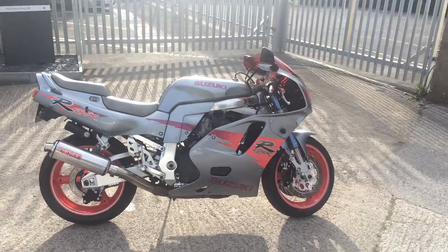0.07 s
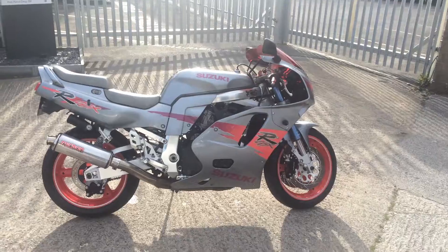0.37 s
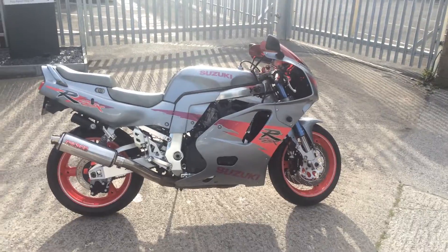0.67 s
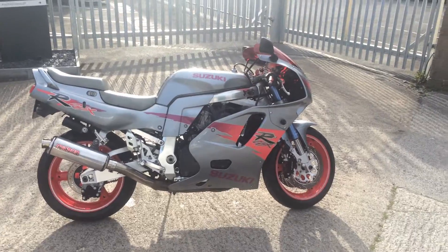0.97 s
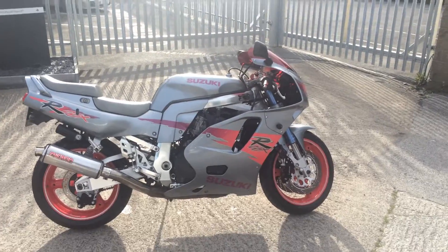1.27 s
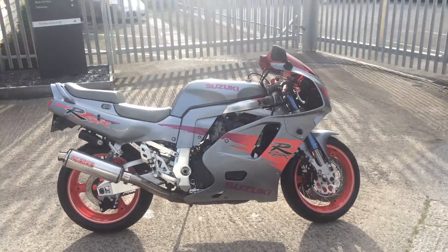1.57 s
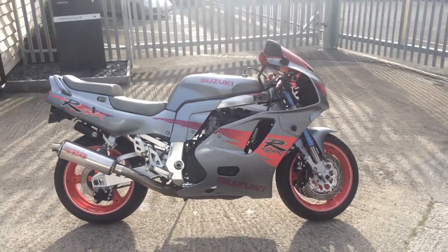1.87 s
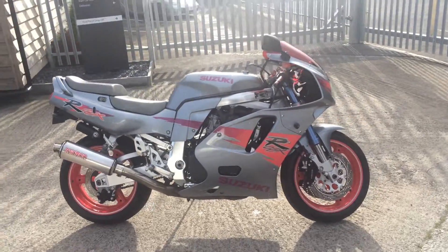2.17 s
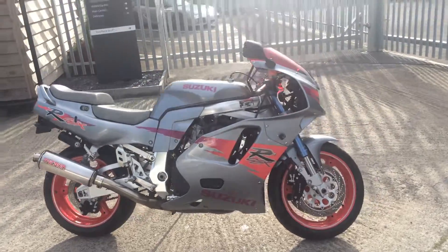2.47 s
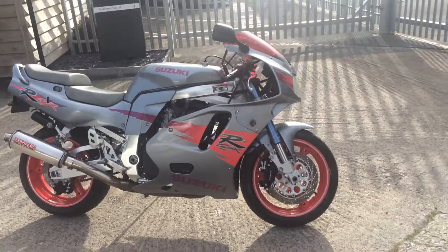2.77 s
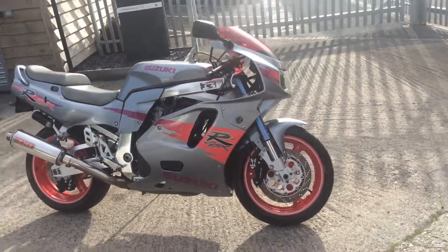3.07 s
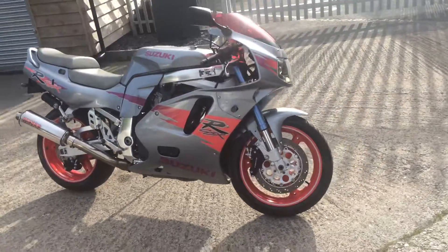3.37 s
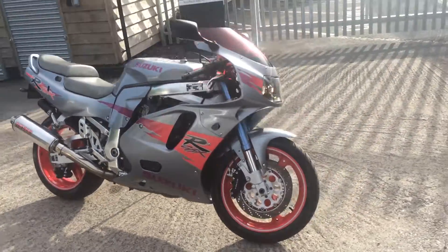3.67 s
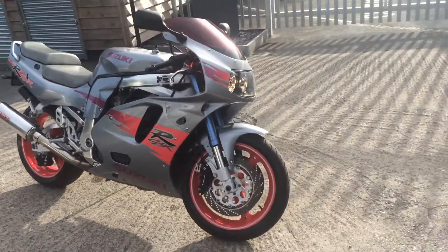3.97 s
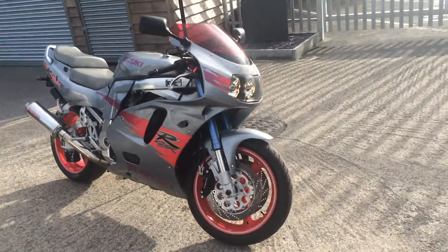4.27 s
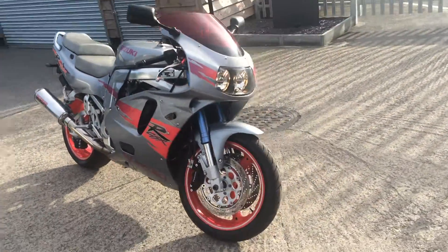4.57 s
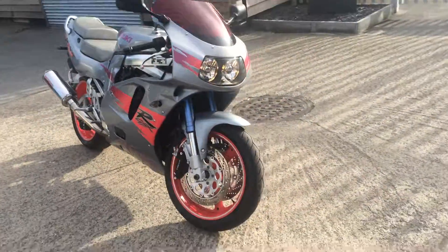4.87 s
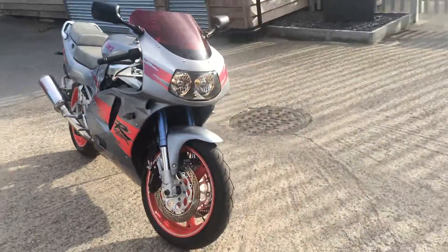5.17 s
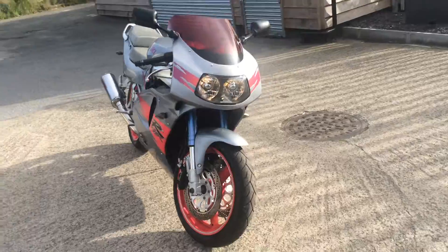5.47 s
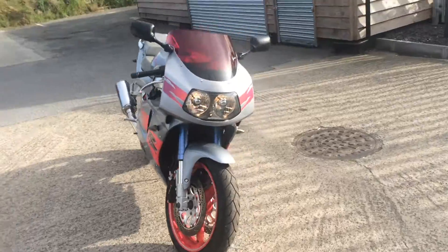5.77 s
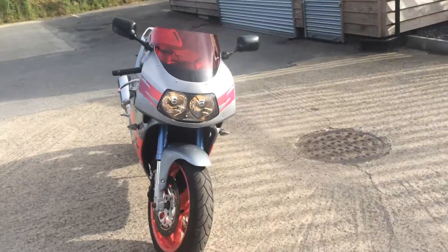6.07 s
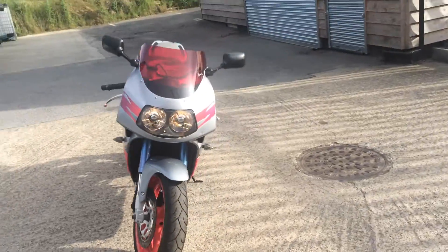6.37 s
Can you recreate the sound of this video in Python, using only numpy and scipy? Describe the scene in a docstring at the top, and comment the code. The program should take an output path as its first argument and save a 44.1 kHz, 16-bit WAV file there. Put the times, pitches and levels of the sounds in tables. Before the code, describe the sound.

A motorcycle engine runs at a lumpy idle outdoors, strong and weak firings booming through the silencer. Metallic rattling, light knocks, ticking and hiss ride on the low throb. Heard from close by on a walk from the side of the bike to its nose, the clatter changes colour and eases a little, while the exhaust begins to bounce faintly off nearby sheds.

```python
"""A thumping four-cylinder motorcycle idles unevenly, surging three times a second in a concrete yard.
Strong and weak firings boom through the silencer, and the same firings rattle the gears.
The clutch knocks, valves tick, and the chain and intake hiss in step, over a soft rumble of air.
The tone shifts as the listener walks from the bike's side to its nose; late on, an echo grows."""
import sys
import numpy as np
from scipy import signal
from scipy.fft import rfft, irfft
from scipy.io import wavfile

SR = 44100
rng = np.random.default_rng(int(sys.argv[2]) if len(sys.argv) > 2 else 0)


def wav_record(signal):
    """Record a signal, one row per channel, as 16-bit PCM in the file named by sys.argv[1]."""
    frames = np.transpose(np.atleast_2d(signal))
    bounded = np.clip(frames, -1, 1)
    # unit amplitude maps onto the largest positive 16-bit level
    quanta = np.round(bounded * 32767).astype(np.int16)
    wavfile.write(sys.argv[1], SR, quanta)


N = 292383
TIME = np.arange(N) / SR

# the bike's side, front quarter and nose as places on the walk: ahead (0 beside it, 1 in front)
VIEWPOINTS = [.1, .57, .93]


def from_db(db):
    """Turn decibels into a gain."""
    return 10 ** (np.asarray(db) / 20)


def unit_power(x):
    """Scale a signal to an average power of one."""
    return x / np.sqrt(np.mean(x ** 2) + 1e-20)


def in_time(rows):
    """Turn rows of (time_s, values...) into one curve per value."""
    times, *columns = np.transpose(rows)
    return [np.interp(TIME, times, column) for column in columns]


def clicks(times, sizes):
    """One click of the given size at each time."""
    inside = (times >= 0) & (times < TIME[-1])
    return np.bincount((times[inside] * SR).astype(int), sizes[inside], N) + 1e-18


def resonate(x, hz, width_hz):
    """Ring at one pitch; the narrower the width, the longer the ring."""
    r = np.exp(-np.pi * width_hz / SR)
    feedback = [1, -2 * r * np.cos(2 * np.pi * hz / SR), r * r]
    return signal.lfilter(np.array([1, 0, -1]) * (1 - r * r) / 2, feedback, x)


def keep_band(x, hz, kind, order=2):
    """Keep the "low" or the "high" side of a frequency."""
    return signal.sosfilt(signal.butter(order, hz, kind, fs=SR, output="sos"), x)


def fade(x, seconds):
    """Give each click a tail that dies away."""
    return signal.lfilter([1], [1, -np.exp(-1 / (seconds * SR))], x)


def delayed(x, seconds):
    """The same sound arriving by a longer path, whose length may change."""
    return np.interp(TIME - seconds, TIME, x)


def metal_noise(colour, ripple_db):
    """Noise of a given colour, made uneven by the many close resonances of the metal castings."""
    hz, db = np.transpose(colour)
    bins_hz = np.arange(N // 2 + 1) * SR / N + 1
    modes_hz = np.linspace(200 ** .5, 16000 ** .5, 400) ** 2
    ripple = ripple_db * np.interp(bins_hz, modes_hz, np.sqrt(3) * rng.uniform(-1, 1, len(modes_hz)))
    gain = from_db(np.interp(np.log(bins_hz), np.log(hz), db, left=-90, right=-90) + ripple)
    return unit_power(irfft(rfft(rng.standard_normal(N)) * gain, N))


def firings():
    """When and how hard the engine fires: in each surge the crank runs ahead, then drags as burns weaken."""
    # surges of the idle: start_s, lead_s (how far the crank runs ahead), level_db
    surges = [(0.116, 0.0025, -1.7), (0.2302, 0.004, -1.5), (0.5617, 0.0038, -2), (0.8844, 0.0069, -1),
              (1.1128, 0.0115, -0.97), (1.4445, 0.0047, -0.6), (1.7678, 0.0042, -1.4),
              (2.1023, 0.0008, -1.15), (2.4325, 0.003, -0.16), (2.8802, 0.0082, -0.6),
              (3.2142, 0.0093, -2.3), (3.5443, 0.0068, -0.04), (3.873, 0.009, -0.85),
              (4.2113, 0.0055, -0.5), (4.5345, 0.005, -1.3), (4.8741, 0.012, 0.05), (5.2093, 0.0075, -1.9),
              (5.5154, 0.0094, -0.55), (5.8483, 0.0076, 0), (6.1777, 0.000074, 0.16), (6.501, 0.00079, -1),
              (6.619, 0.005, 4)]
    # cylinders in firing order: surge_start_db, surge_end_db, spread_db, late_s
    cylinders = [(-0.5, 0.7, 0.5, 0), (-1.1, -4, 0.03, -.0007), (0, -19.5, 3, -.0001),
                 (-10, -7.5, 2, .0005)]
    # burns that fail or fire unusually hard: time_s, level_db
    odd_burns = [(0.283, -16.5), (0.42, -4), (0.533, -22), (0.639, -7), (0.936, -11.5), (1.02, -22),
                 (1.113, -3.0), (1.24, -1), (1.414, -9), (1.444, -6), (1.496, -3.5), (1.523, -4),
                 (1.574, -6.5), (1.601, -15), (1.821, -21.5), (2.016, 0.5), (2.073, -17), (2.102, -5.5),
                 (2.184, -10), (2.212, 1.5), (2.322, -4.5), (2.46, 0), (2.487, -13.5), (2.514, -18.5),
                 (2.598, -5.5), (2.794, -16.5), (3.124, -7.0), (3.238, -7.5), (3.37, -3.5), (3.398, -25),
                 (3.455, -10), (3.568, -7), (3.701, -25), (3.951, -23), (4.033, -14), (4.062, -7),
                 (4.12, -8.5), (4.18, -17.5), (4.289, -7), (4.34, -4), (4.395, -28), (4.45, -0.5),
                 (4.478, -25), (4.507, -7), (4.671, -2), (4.785, -26), (4.845, -4.5), (4.95, -18),
                 (5.061, -6), (5.287, -3.0), (5.314, 1.5), (5.341, -2.5), (5.398, -1), (5.426, -3.5),
                 (5.455, -18), (5.485, -6.5), (5.702, -6.0), (5.925, -9.5), (6.089, -27), (6.231, -28),
                 (6.258, -20.5), (6.312, 1.5), (6.34, -1.5), (6.368, -6.5)]
    firings_per_s, sag_db_per_s = 36.1, 187
    full_burn_lag_s, flywheel_memory = .0013, .6
    starts, leads, surge_db = np.transpose(surges)
    first_firing = np.r_[0, np.cumsum(np.round(np.diff(starts) * firings_per_s))]
    number = np.arange(int(first_firing[-1]) + 1)
    # progress runs from 0 to 1 through each surge
    surge, progress = np.divmod(np.interp(number, first_firing, np.arange(len(starts))), 1)
    surge = surge.astype(int)
    cylinder = (number - first_firing[surge]).astype(int) % len(cylinders)
    start_db, end_db, spread_db, late_s = np.array(cylinders)[cylinder].T
    early_s = leads[surge] * np.sin(np.pi * progress ** .918)
    times = np.interp(number, first_firing, starts) - early_s + late_s
    level_db = surge_db[surge] + start_db + progress * (end_db - start_db)
    level_db += sag_db_per_s * leads[surge] * (.5 - progress)   # more lead, steeper fall
    level_db += spread_db * np.clip(rng.standard_normal(len(times)), -1.5, 1.5)
    for time_s, db in odd_burns:
        level_db[np.argmin(abs(times - time_s))] = db
    strength = from_db(level_db)
    # full burns come a little late, and the flywheel carries part of that lag onward
    times += full_burn_lag_s * signal.lfilter([1], [1, -flywheel_memory], strength - strength.mean())
    # one earlier firing: the engine is already running
    return np.r_[times[0] - 1 / firings_per_s, times], np.r_[from_db(end_db[-2]), strength]


def pipe_ring(modes, times, strength, ahead, spread_db, turbulence):
    """Each firing rings every resonance a little differently and leaves a wake of swirling gas."""
    times, sound = times - .0014, 0
    wake = turbulence * fade(clicks(times, strength), .055) * rng.standard_normal(N)
    for hz, width_hz, *levels_db, polarity in modes:
        pulses = clicks(times, strength * from_db(spread_db * rng.standard_normal(len(times))))
        gain = np.sign(polarity) * from_db(np.interp(ahead, VIEWPOINTS, levels_db))
        sound += gain * resonate(pulses + wake, hz, width_hz)
    return sound


def exhaust(times, strength, ahead):
    """Pressure pulses boom through the silencer, which passes little above its dead note."""
    # silencer resonances: pitch_hz, width_hz, side_db, quarter_db, nose_db, polarity
    silencer_modes = [(39.2, 7.5, 32, 21, 25, 1), (73.5, 141, 33, 29, 31, -1),
                      (125.1, 23.8, 39.5, 40.5, 35, -1), (166.8, 102.4, 42, 35.5, 39.5, 1),
                      (181.4, 36.4, 42.5, 38, 40.5, -1), (152.6, 15.6, 11, 30.5, 23.5, 1),
                      (214.8, 11.6, 13, 32.5, 28, -1), (228, 22, 13, 29.5, 28, -1)]
    # higher pipe resonances: pitch_hz, width_hz, side_db, quarter_db, nose_db, polarity
    pipe_modes = [(274.4, 20.6, 12, 21.5, 19.5, 1), (311.5, 20.5, 15, 11.5, 15.5, -1),
                  (335, 13.5, 15.5, 13, 14, 1), (418, 57, 12.5, 7, 2, -1), (459.4, 41, 13, 11.5, 4, 1)]
    # boost of the deep throb along the walk: time_s, boost_db
    throb = [(0, 2), (2.2, 3), (3.2, 0), (4.6, -0.5), (5.3, 0.5), (6.6, 2.5)]
    boom = pipe_ring(silencer_modes, times, strength, ahead, spread_db=.6, turbulence=.0048)
    pipes = pipe_ring(pipe_modes, times, strength, ahead, spread_db=2.5, turbulence=.013)
    silencer = signal.ellip(4, 1, 35, 230, fs=SR, output="sos")
    sound = keep_band(signal.sosfilt(silencer, boom), 2300, "low")
    sound += keep_band(keep_band(pipes, 770, "low"), 174, "high")
    sound -= resonate(sound, hz=247.3, width_hz=29)   # the dead note
    throb_db, = in_time(throb)
    return sound + (from_db(throb_db) - 1) * resonate(sound, hz=74, width_hz=25)


def fairing_hollows(rattle):
    """Hollows in the fairing (the bike's shell) ring with the rattle as the listener passes each opening."""
    # openings: passing_s, half_length_s, pitch_hz, width_hz, level_db
    openings = [(2.0, 0.31, 1583, 150, -7), (2.6, 0.39, 1280, 140, -12), (3.8, 0.84, 636, 130, -8),
                (5.25, 0.37, 1485, 91, -7), (6.25, 0.85, 760, 70, -9)]
    sound = 0
    for passing_s, half_length_s, hz, width_hz, db in openings:
        nearness = np.exp(-((TIME - passing_s) / half_length_s) ** 2)
        ring = resonate(resonate(rattle, hz, width_hz), hz, width_hz)
        sound += from_db(db) * nearness * unit_power(ring)
    return sound


def crankcase_ring(blow_s, blow, ahead):
    """Each gear blow and its two rebounds ring the engine's case, with a new mix of pitches every time."""
    # crankcase resonances: pitch_hz, width_hz, side_db, quarter_db, nose_db
    case_modes = [(768, 33, -22, -32, -14), (824, 28, -14, -15.5, -15), (885, 41, -21, -21.5, -14),
                  (1214, 23, -15, -33, -16), (1302, 25, -20, -13, -20), (1459.5, 23, -23, -22, -18.5),
                  (1634, 34, -14, -23, -25), (1705, 58, -17, -28, -14), (2478, 43, -17, -16, -17.5)]
    rebound_s, rebound_loss_db = .008, 2
    bounce = np.arange(3)
    scatter = rng.uniform(-.3083, .3, (len(blow), len(bounce)))
    hit_s = (blow_s[:, None] + .00202 + rebound_s * (bounce + scatter)).ravel()
    force = (blow[:, None] * from_db(-rebound_loss_db * bounce)).ravel()
    sound = 0
    for hz, width_hz, *levels_db in case_modes:
        sizes = force * from_db(rng.uniform(-5, 5, len(force))) * rng.choice([-1, 1], len(force))
        ring = unit_power(resonate(clicks(hit_s, sizes), hz, width_hz))
        sound += from_db(np.interp(ahead, VIEWPOINTS, levels_db)) * ring
    return keep_band(sound, 3000, "low")


def gear_clatter(times, strength, ahead):
    """Loose gears slap together on every power stroke, hardest when a strong burn follows a weak one."""
    # colour of the clatter from the side, front quarter and nose: pitch_hz, level_db
    side = [(280, -24), (480, 5.5), (580, 3), (800, 1.5), (1020, -2.5), (1250, 1), (1700, -1.5), (2200, -3),
            (2600, -4.5), (3100, -10), (3600, -19), (4500, -20.5), (6000, -26), (9900, -120)]
    quarter = [(280, -18), (480, 0), (600, 10), (800, 0), (1020, 2), (1400, 3.5), (1700, 4.5), (2100, 1),
               (2600, -1.5), (3100, -6), (3600, -15.5), (4500, -32), (6000, -51), (9900, -120)]
    nose = [(280, 10), (480, 0), (600, 4), (800, 1.5), (1080, -2), (1400, 4), (1750, 1), (2100, -0.5),
            (2600, -4.5), (3100, -10), (3900, -18), (4600, -22), (6000, -52), (9900, -120)]
    next_burn = np.roll(strength, -1)   # a power stroke comes before its exhaust pulse
    burn_db = 9.5 * np.minimum(next_burn, .75)
    jolt_db = np.clip(next_burn - strength, 0, .5)
    blow = from_db(burn_db + jolt_db + rng.uniform(-1, 1, len(times)))
    blow_s = times + .0041 + .001217 * rng.standard_normal(len(times))
    rattling = unit_power(fade(fade(clicks(blow_s, blow), .021), .0049))
    # blows break up into small tooth contacts, about 900 a second
    contacts = unit_power(fade((rng.random(N) < 900 / SR) + 1e-18, .004))
    loudness = unit_power(np.sqrt(.37 + rattling ** 2) * np.sqrt(.77 + contacts ** 2))
    # the fairing hides and reveals parts of the engine as the listener moves
    shares = [np.interp(ahead, VIEWPOINTS, row) for row in np.eye(3)]
    castings = sum(np.sqrt(share) * metal_noise(colour, ripple_db=1.7)
                   for share, colour in zip(shares, (side, quarter, nose)))
    hollows = fairing_hollows(loudness * rng.standard_normal(N))
    return from_db(-2.5) * (loudness * castings + hollows) + crankcase_ring(blow_s, blow, ahead)


def valves(times):
    """Valves snap shut twice per firing; gives the loudness of their ticks and their thin ring."""
    # valve gear resonances: pitch_hz, width_hz, level_db
    valve_modes = [(7300, 80, -15), (7720, 90, -17), (8050, 80, -13.5), (8850, 100, -14.5),
                   (9300, 110, -18)]
    shut_s = np.r_[times + .001, times + .0135] + .0011 * rng.standard_normal(2 * len(times))
    sizes = from_db(4 * rng.standard_normal(len(shut_s)))
    ticks = unit_power(fade(clicks(shut_s, sizes), .0022))
    ring = 0
    for hz, width_hz, db in valve_modes:
        taps = clicks(shut_s, rng.uniform(-1.4, 1, len(shut_s)))
        ring += from_db(db) * unit_power(resonate(taps, hz, width_hz))
    return ticks, ring


def engine_hiss(times, strength, ahead):
    """Chain and intake hiss swells with strong firings and each turn of the crank; valves tick in it."""
    # colour of the hiss: pitch_hz, level_db
    colour = [(2500, -2), (3800, 6), (4800, 2), (6000, 4.5), (7500, 5.5), (9500, 5.5), (11000, 3),
              (13000, 0.5), (15500, 0.5)]
    # its bounce off the concrete: time_s, delay_s, gain
    ground = [(0, 0.001, .2), (1.6, 0.0013, 0.31), (2.5, 0.0013, 0.32), (3.6, 0.001395, 0.23),
              (4.6, .00155, 0.34), (6.6, 0.0016, .2)]
    swell = unit_power(fade(fade(clicks(times - .021, strength), .021), .018))
    crank_turns = np.interp(TIME - .013, times, np.arange(len(times))) / 2
    sway = from_db(.74 * np.cos(2 * np.pi * crank_turns))
    ticks, ring = valves(times)
    in_view = np.exp(-((ahead - .44) / .19) ** 2)   # the ring is heard near the front quarter
    loudness = unit_power(sway * np.sqrt(.57 + swell ** 2 + .054 * ticks ** 2))
    direct = loudness * (metal_noise(colour, ripple_db=1.1) + in_view * ring)
    delay_s, gain = in_time(ground)
    return (direct + gain * delayed(direct, delay_s)) / np.sqrt(1 + gain ** 2)


def air_rumble():
    """A soft low rumble of air fills the yard."""
    lows = keep_band(rng.standard_normal(N), 65, "low")
    return from_db(-43.5) * unit_power(keep_band(lows, 38, "high", order=4))


def clutch_knocks():
    """Each knock is one sharp blow and a short burst of contacts that ring the clutch cover."""
    # the hardest knocks: time_s, level_db
    knocks = [(0.3187, -30), (0.5448, -27.5), (0.5725, -30), (0.648, -31), (0.7553, -32.5), (0.786, -32),
              (0.893, -31), (0.9758, -26), (1.0921, -30), (1.122, -32), (1.3081, -32), (1.4203, -27.5),
              (1.5316, -30), (1.9706, -31), (2.0818, -31), (2.1941, -30), (2.5508, -30), (2.6371, -27),
              (2.8885, -29.5), (3.1953, -31), (4.19, -35), (4.7323, -32), (4.8549, -22.5), (5.069, -32),
              (5.1843, -31), (5.825, -31), (6.3751, -30.5)]
    # cover resonances: pitch_hz, width_hz, level_db
    cover_modes = [(990, 120, -2), (1284, 95, -5), (1520, 140, -1), (1868, 69, 3.5), (2620, 85, -11)]
    times, level_db = np.transpose(knocks)
    blows = clicks(times, from_db(level_db + 5.5))
    burst = keep_band(7 * blows + fade(blows, .009) * rng.standard_normal(N), 3500, "low")
    crack = from_db(-18) * resonate(burst, hz=4000, width_hz=1800)
    return crack + sum(from_db(db) * resonate(burst, hz, width_hz) * (-1) ** k
                       for k, (hz, width_hz, db) in enumerate(cover_modes))


def shed_echo(tailpipe, ahead_gain=1):
    """The exhaust bounces off the sheds, louder towards the end of the walk."""
    # the echo: time_s, delay_s, gain
    echo = [(4.3, 0.019, 0.03), (5.1, 0.017, .18), (6.43, 0.01285, 0.35)]
    delay_s, gain = in_time(echo)
    return gain * delayed(tailpipe, delay_s)


def tiny_snap():
    """One bright snap, over in about a millisecond."""
    click = clicks(times=np.array([5.3865]), sizes=from_db([-38.5]))
    return keep_band(fade(click, .0006) * rng.standard_normal(N), 2700, "high")


def scene():
    """The same firings drive exhaust, clatter and hiss; knocks, a snap and the air join them."""
    # the walk round the bike: time_s, ahead (0 beside it, 1 in front)
    walk = [(0, 0.078), (1.8, 0.15), (3.0, 0.45), (3.9, 0.63), (5.1, 0.76), (6.63, 1)]
    # engine noise along the walk: time_s, clatter_db, hiss_db
    engine_levels = [(0.1, -42.5, -48), (0.8, -42.5, -49), (1.7, -42.5, -50), (2.3, -43, -50),
                     (2.9, -42, -50.5), (3.6, -43, -50), (4.3, -43, -50.5), (4.9, -44, -51),
                     (5.5, -45.5, -53.5), (6.1, -44.5, -54.5), (6.6, -45, -56)]
    times, strength = firings()
    ahead, = in_time(walk)
    clatter_db, hiss_db = in_time(engine_levels)
    tailpipe = exhaust(times, strength, ahead)
    engine = from_db(clatter_db + 1.94) * gear_clatter(times, strength, ahead) + clutch_knocks()
    engine += from_db(hiss_db - 3) * engine_hiss(times, strength, ahead)
    return (tailpipe + shed_echo(tailpipe) + engine + tiny_snap() + air_rumble())[None]


def record(dry):
    """The sound opens after a brief silence, its biggest peaks rounded and its highest treble cut."""
    start_s, cutoff_hz = .083, 15400
    rounded = .6 * np.tanh(dry / .6)
    treble_cut = signal.ellip(10, .1, 90, cutoff_hz, fs=SR, output="sos")
    return signal.sosfilt(treble_cut, rounded * (TIME >= start_s))


dry = scene()
out = record(dry)
wav_record(out)
```